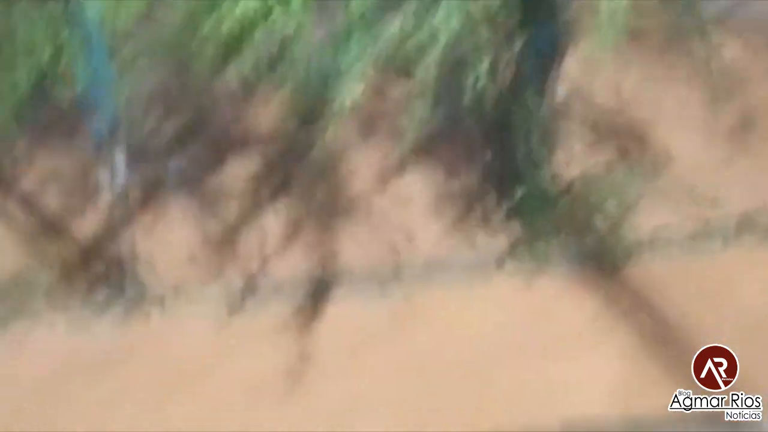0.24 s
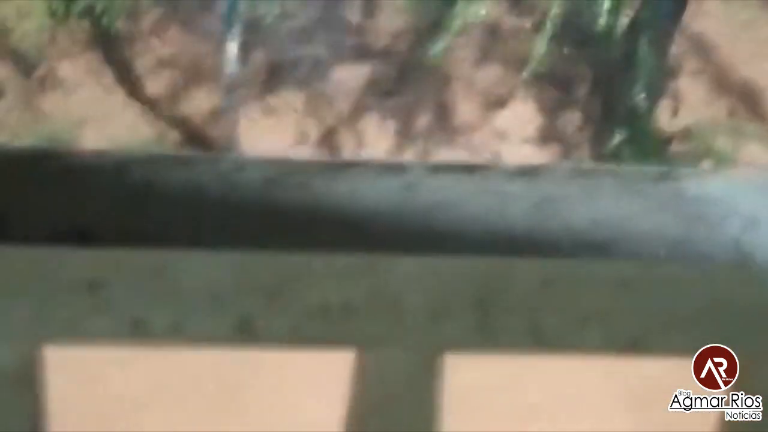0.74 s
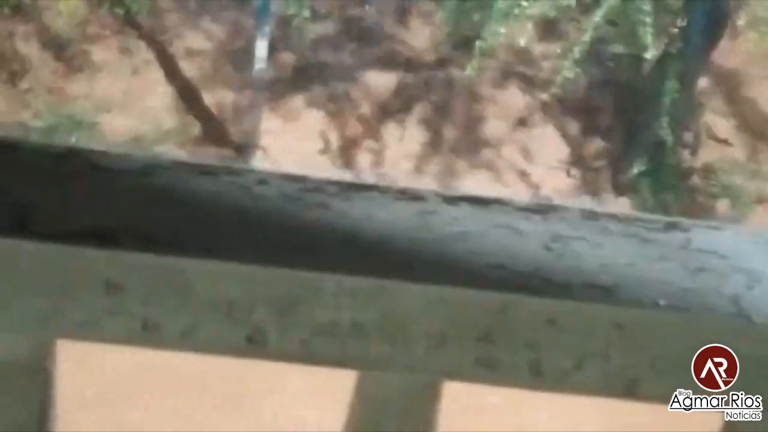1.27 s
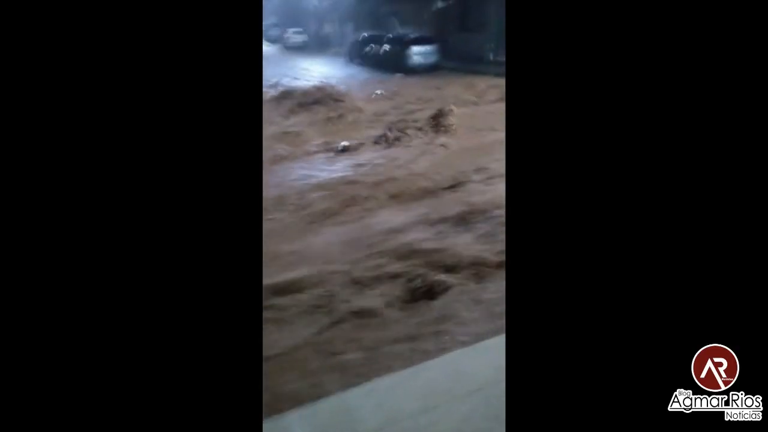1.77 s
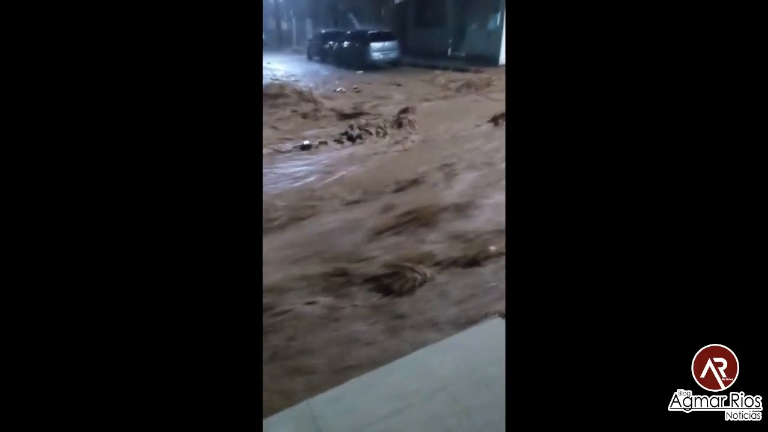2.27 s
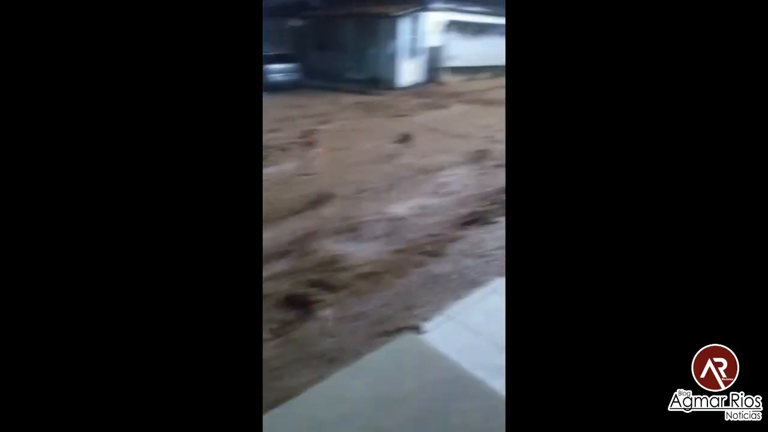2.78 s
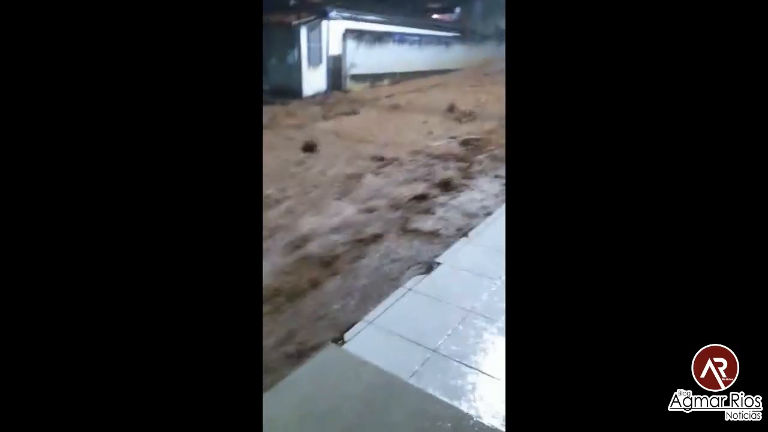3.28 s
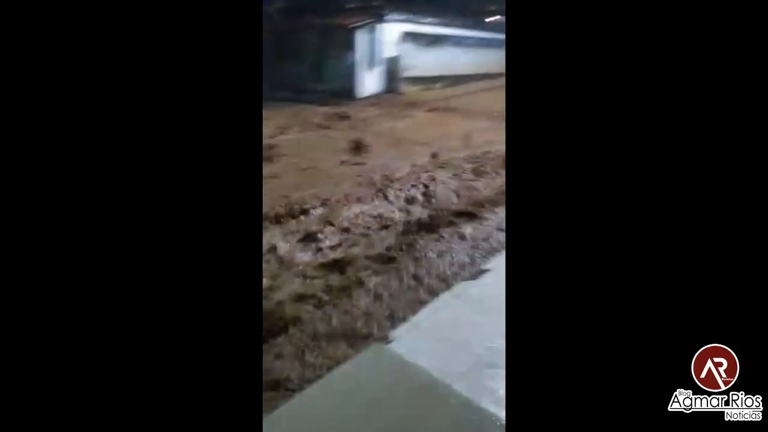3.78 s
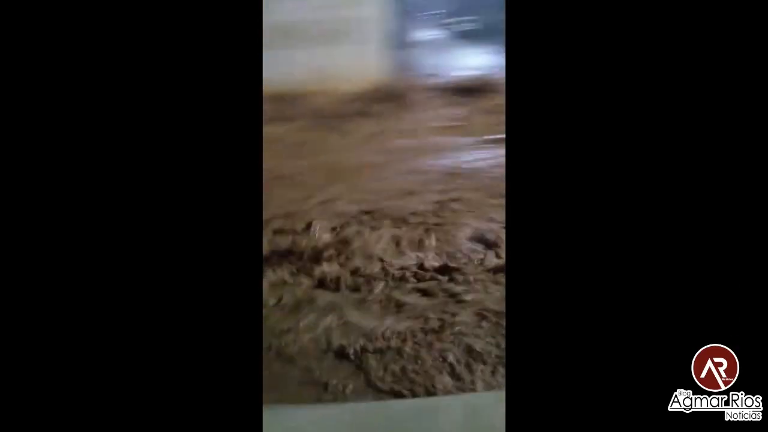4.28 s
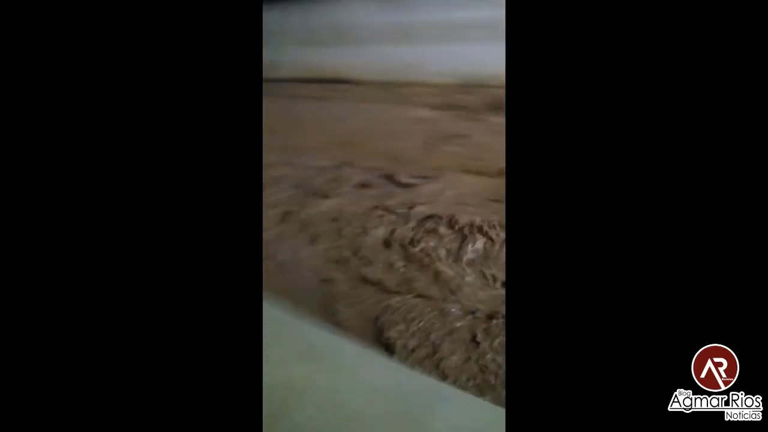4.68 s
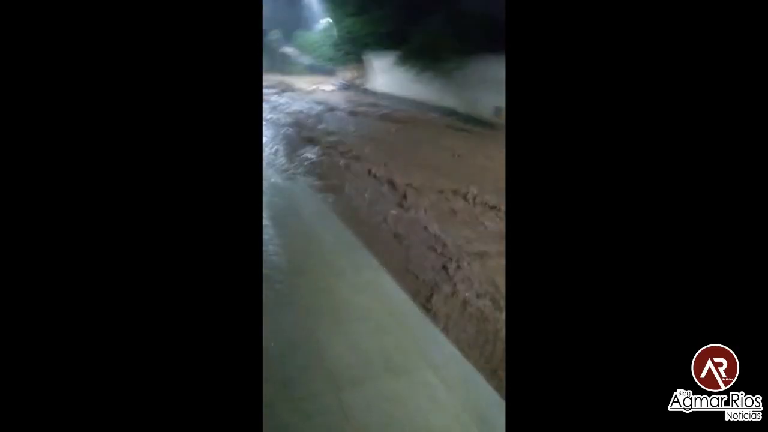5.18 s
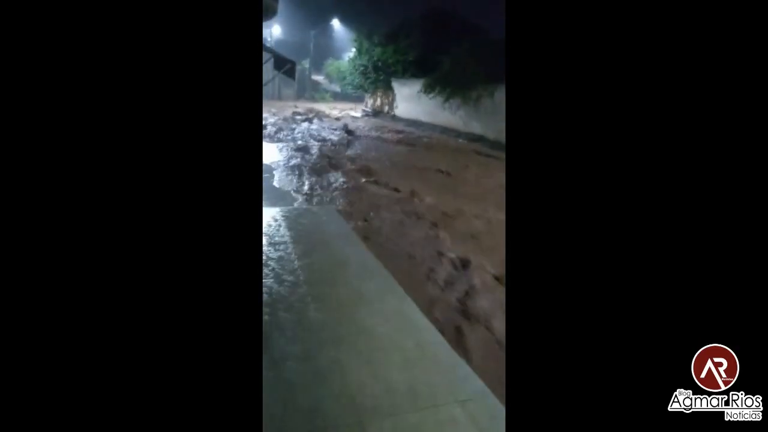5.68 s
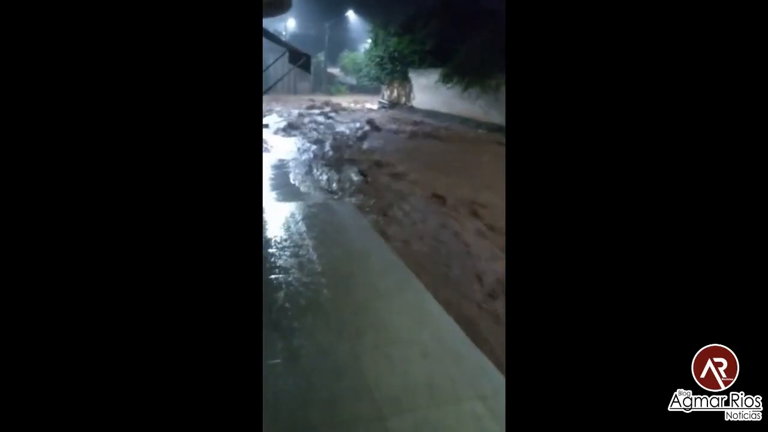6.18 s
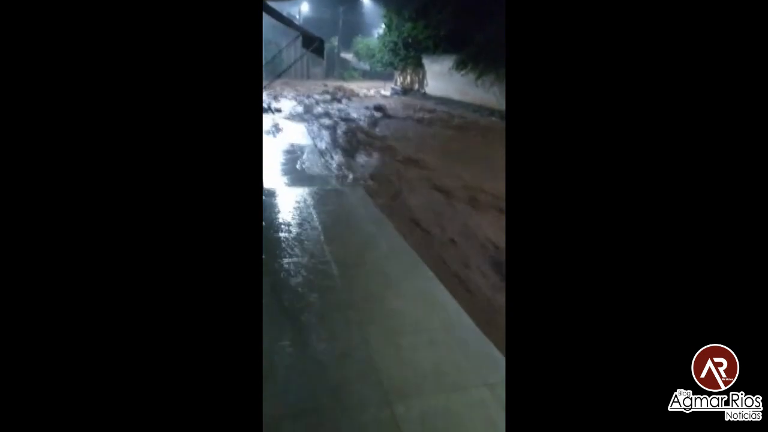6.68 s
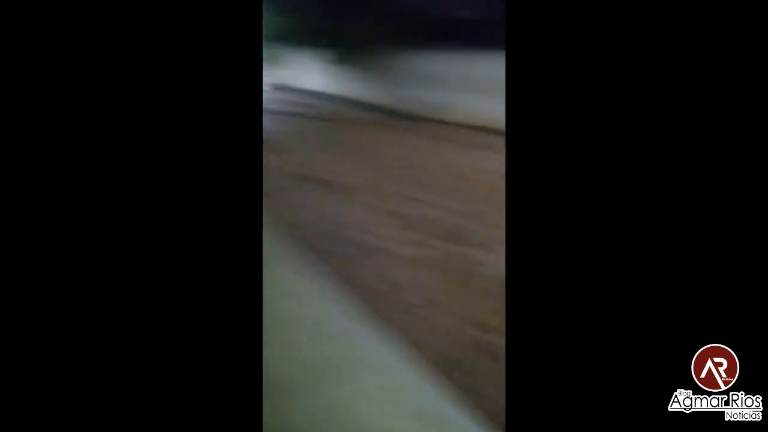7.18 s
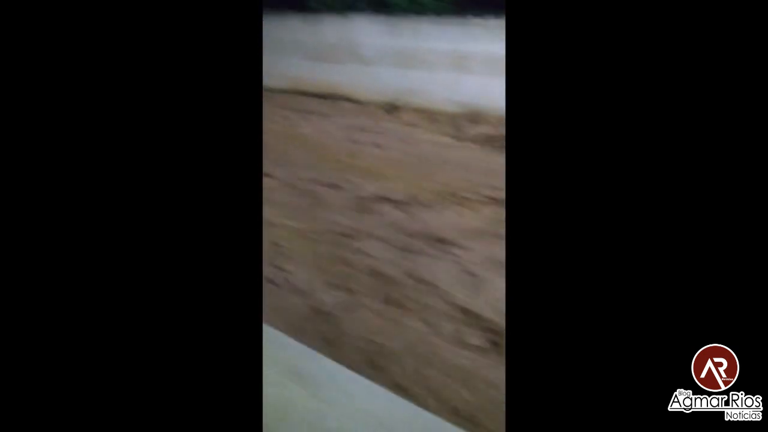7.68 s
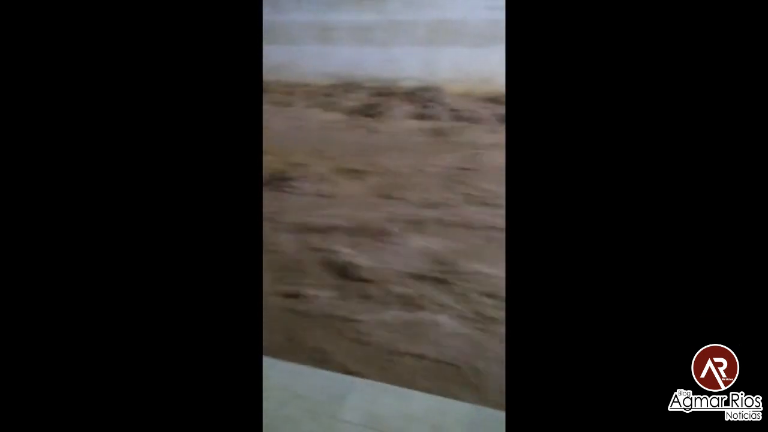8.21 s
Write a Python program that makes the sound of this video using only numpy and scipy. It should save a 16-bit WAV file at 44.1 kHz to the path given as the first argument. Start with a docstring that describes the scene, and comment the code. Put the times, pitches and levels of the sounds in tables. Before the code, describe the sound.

Steady grainy rain and far water wash, abruptly replaced by a close street flood roaring low, with hollow gurgles, slaps and gulps.

```python
"""Flooded street from two places

First a balcony: rain hisses on leaves over far brown water, both as banded noise with burst clicks in it.
After a cut, a phone at the kerb of a street turned torrent: a deep roar of burst air pockets, ringing gurgles,
slaps and gulps, and ticks of bright noise from drops close by.
The phone widens its image by taking from each port a late copy of the other one."""
import sys
import numpy as np
from scipy import signal
from scipy.fft import rfft, irfft, next_fast_len
from scipy.io import wavfile

SR = 44100
rng = np.random.default_rng(int(sys.argv[2]) if len(sys.argv) > 2 else 0)


def wav_record(signal):
    """Record a signal, one row per channel, as 16-bit PCM in the file named by sys.argv[1]."""
    frames = np.transpose(np.atleast_2d(signal))
    bounded = np.clip(frames, -1, 1)
    # unit amplitude maps onto the largest positive 16-bit level
    quanta = np.round(bounded * 32767).astype(np.int16)
    wavfile.write(sys.argv[1], SR, quanta)


N = 372644
SIZE = next_fast_len(N, True)
TIME = np.arange(N) / SR   # seconds
HZ = np.arange(1, SIZE // 2 + 2) * SR / SIZE   # one bin up, so that its logarithm exists
CUT_S = 1.677   # from the balcony to the street


def from_db(db):
    """Decibels to gain."""
    return 10 ** (np.asarray(db) / 20)


def rms_one(x):
    """Scales to rms 1."""
    return x / np.sqrt(np.mean(x ** 2) + 1e-20)


def in_time(rows):
    """Columns of a curve at every sample."""
    s, *columns = np.transpose(rows)
    return [np.interp(TIME, s, c) for c in columns]


def in_pitch(rows):
    """Columns of a spectrum at every frequency bin, straight lines over log frequency."""
    hz, *columns = np.transpose(rows)
    return np.array([np.interp(np.log(HZ), np.log(hz), c) for c in columns])


def bell(hz, centre_hz, octaves):
    """A bump of height 1 around a pitch."""
    return np.exp(-(np.log2(hz / centre_hz) / octaves) ** 2)


def bandpass(x, order, low_hz, high_hz):
    """Keeps what lies between two pitches."""
    return signal.sosfilt(signal.butter(order, [low_hz, high_hz], "band", fs=SR, output="sos"), x)


def drift(rate_hz):
    """Slow chance of spread 1: noise twice through a one-pole low-pass, drawn at every 40th sample."""
    r = np.exp(-2 * np.pi * rate_hz * 40 / SR)
    noise = rng.standard_normal(N // 40 + 2002)
    slow = signal.lfilter([1], [1, -2 * r, r * r], noise)[2000:]   # skips the start-up
    return np.interp(np.arange(N) / 40, np.arange(len(slow)), rms_one(slow))


def ring(clicks, hz, t60):
    """A unit click sets a sine of height 1 ringing, down 60 dB after t60 seconds."""
    r, w = from_db(-60 / (t60 * SR)), 2 * np.pi * hz / SR
    return signal.lfilter([0, np.sin(w)], [1, -2 * r * np.cos(w), r * r], clicks + 1e-18)


def soft(x):
    """Water meets water gently: no click, no push of air."""
    return bandpass(x, 2, 170, 1100)


def bursts(per_s, spread_db, grain_db):
    """Countless far bursts merge into noise; the near ones stand out as clicks of very uneven size."""
    sizes_db = spread_db * np.minimum(rng.exponential(1, (2, N)), 5)
    sizes = from_db(sizes_db) * rng.choice([-1, 1], (2, N))
    near = sizes * (rng.random((2, N)) < per_s / SR)
    return rng.standard_normal((2, N)) + from_db(grain_db) * rms_one(near)


UPPER_ROAR_HZ, UPPER_ROAR_OCTAVES = 754, 0.3
RUMBLE_HZ, RUMBLE_OCTAVES = 90, 0.89


def water(drive, colour, likeness, bass_db, treble_db, treble_hz, surge_db, patchy_db, patchy_hz, octaves,
          flicker, upper_db=0, rumble_db=0):
    """Two-channel rush in third-octave bands: treble surges together, bands near patchy_hz flicker alone; rms 1."""
    alike = np.clip(likeness, -.99, .99)
    mid, side = rfft(drive, SIZE) * np.sqrt([1 + alike, 1 - alike])
    sides = np.array([mid + side, mid - side]) * from_db(in_pitch(colour))
    place = 3 * np.log2(HZ / 30)   # third-octaves above 30 Hz
    surge, out = drift(9.0), 0
    for k in range(29):
        band = np.cos(np.pi / 2 * np.clip(place - k, -1, 1)) ** 2     # neighbours overlap and sum to one
        hz = 30 * 2 ** (k / 3)
        high = 1 / (1 + (treble_hz / hz) ** 2)
        gain_db = (1 - high) * bass_db + high * (treble_db + surge_db * surge)
        gain_db = gain_db + bell(hz, patchy_hz, octaves) * patchy_db * drift(flicker)
        gain_db = gain_db + upper_db * bell(hz, UPPER_ROAR_HZ, UPPER_ROAR_OCTAVES)
        gain_db = gain_db + rumble_db * bell(hz, RUMBLE_HZ, RUMBLE_OCTAVES)
        out = out + from_db(gain_db) * irfft(sides * band, SIZE)[:, :N]
    return rms_one(out)


def gurgle(centre_hz, per_s, cycles, octaves):
    """Large air pockets are trapped at random and ring; most lie near the pitch of the moment; rms 1."""
    sizes_db = 2.6 * np.minimum(rng.exponential(1, N), 3)
    sizes = from_db(sizes_db) * (rng.random(N) < per_s / SR)
    pitches, dealt = np.geomspace(170, 1000, 16), rng.integers(0, 16, N)
    rings = np.zeros(N)
    for k, hz in enumerate(pitches):
        pushes = sizes * bell(hz, centre_hz, octaves) * (dealt == k)
        rings += ring(pushes, hz, cycles / hz)
    return rms_one(soft(rings))


HOLLOW_SWING, HOLLOW_RATE_HZ = 3.5, 9.0   # spread of the emptiness, speed of its drift


def hollowed(pair, mid_hollows, side_hollows):
    """Takes narrow bands out of mid and side: some always empty, others dropping out by chance."""
    out = irfft(np.array([pair[0] + pair[1], pair[0] - pair[1]]) / 2, SIZE)[:, :N]
    for part, hollows in enumerate([mid_hollows, side_hollows]):
        for hz, width_hz, empty in hollows:
            shape = 1 / (1 + (2 * (HZ - hz) / width_hz) ** 12)
            band = irfft(rfft(out[part], SIZE) * shape, SIZE)[:N]
            out[part] -= band * np.clip(empty + HOLLOW_SWING * drift(HOLLOW_RATE_HZ), 0, 1)
    return np.array([out[0] + out[1], out[0] - out[1]])


# narrow bands of the balcony sound drop out briefly by chance, most often around 3340 Hz
DROPOUT_LOW_HZ, DROPOUT_WIDTH_HZ, DROPOUT_CENTRE_HZ = 2810, 200, 3340
DROPOUT_EMPTY, DROPOUT_LOSS_PER_OCTAVE = -0.1, 2.7   # mean emptiness at the centre, and its loss away from it
# more such bands at the top of the balcony sound: pitch_hz, width_hz, mean_emptiness (0-1 once chance is added)
TOP_HOLLOWS = [(12050, 750, 2.6), (11500, 400, -.3), (11000, 350, -1.3), (14750, 600, 1.5)]


def with_dropouts(rush):
    """A row of neighbouring bands, each dropping out on its own; the side has every second one."""
    gaps = []
    for hz in DROPOUT_LOW_HZ + DROPOUT_WIDTH_HZ * np.arange(24):
        away_octaves = abs(np.log2(hz / DROPOUT_CENTRE_HZ))
        gaps.append((hz, DROPOUT_WIDTH_HZ, DROPOUT_EMPTY - DROPOUT_LOSS_PER_OCTAVE * away_octaves))
    return hollowed(rfft(rush, SIZE), gaps + TOP_HOLLOWS, gaps[::2] + TOP_HOLLOWS)


# the balcony, moment by moment: start_s, level_db, rain_brightness_db, low_water_wash_db
BALCONY_LEVEL = [(0.0, -21, -1, -0.4), (0.25, -22.5, 1, -0.6), (0.42, -22, 1, 1), (0.58, -23.5, 4, 1.5),
                 (0.75, -24.5, 4, 0.5), (0.92, -23, 0.5, 0.8), (1.1, -21, -1.5, -2.8),
                 (1.32, -24, 2.5, -0.5), (1.45, -22.5, 2, 0), (1.66, -23, -0.5, 1.3)]
# relative colour at the balcony: pitch_hz, left_db (per Hz), right_db (per Hz)
BALCONY_COLOUR = [(25, -10, -8), (96, -11.5, -12.5), (175, -1, -1), (500, -2, -0.5), (1660, -0.5, -2),
                  (2120, -2, -3), (3260, -12, -10), (7270, -7, -7), (9400, -18.5, 1), (10400, -23, -7),
                  (12300, -36, -29), (12600, -39, -24), (14500, -45, -22), (15000, -48, -42)]
# how alike the two balcony channels are: pitch_hz, likeness (-1 to 1)
BALCONY_LIKENESS = [(60, 0.93), (180, 0.98), (540, 0.45), (1630, -0.042), (4890, 0.19), (14700, 0.048)]
FAR_GURGLE_DB, FAR_GURGLE_HZ = -15, 576   # lumps in the far water below, against the rush
FADE_OUT_S = .008


def balcony():
    """Rain on leaves and far water: noise with clicks in it, alike in the bass and little related above."""
    level_db, rain_db, wash_db = in_time(BALCONY_LEVEL)
    rush = water(bursts(2200, 5.9, grain_db=-13.0), BALCONY_COLOUR, in_pitch(BALCONY_LIKENESS)[0], wash_db, rain_db,
                 treble_hz=4130, surge_db=0.5, patchy_db=2.5, patchy_hz=2500, octaves=2.35, flicker=20.0)
    lumps = gurgle(FAR_GURGLE_HZ, 150, cycles=13, octaves=0.92)
    rush = with_dropouts(rush + from_db(FAR_GURGLE_DB + wash_db) * lumps)
    return from_db(level_db) * rush * np.clip((CUT_S - TIME) / FADE_OUT_S + .5, 0, 1)


ROAR_LATE_DB, ROAR_ARRIVES_S = 7.5, 0.059   # shortfall at the cut, time constant of the catching up


def roar_arrival_db():
    """At the cut the deep roar lags behind the spray, then catches up exponentially."""
    return -ROAR_LATE_DB * np.exp(-np.maximum(TIME - CUT_S, 0) / ROAR_ARRIVES_S)


# relative colour of the street at the two ports: pitch_hz, left_db (per Hz), right_db (per Hz)
STREET_COLOUR = [(28, -44, -41), (66, -17, -19.5), (153.5, 1, -1), (282, 0, -1.5), (516, -7.5, -6.5),
                 (840, -10.5, -12.5), (1790, -20.5, -24.5), (2180, -18, -22), (2500, -18.5, -31),
                 (3300, -25.5, -34), (4240, -26, -24.5), (5670, -20.5, -25), (7670, -20.5, -24),
                 (9960, -27, -30), (14100, -35, -36)]
# upper roar, about 750 Hz: start_s, level_db
UPPER_ROAR = [(1.7, 2.5), (2.2, -1), (2.6, -2), (2.9, .6), (3.15, 0.5), (3.45, -1.3), (3.78, 1.6),
              (4.0, 1.2), (4.4, 2.5), (4.8, 1.1), (5.1, -2), (5.45, -1.6), (5.75, .1), (6.1, -1.5),
              (6.5, -1.5), (6.9, 0), (7.3, -0.3), (7.7, -1.5), (8.1, 0.3), (8.45, 1)]
# deepest rumble, about 90 Hz: start_s, level_db
RUMBLE = [(1.7, 4), (2.0, 4.5), (2.5, 1.5), (3.4, 0.2), (4.6, 1.1), (5.8, -0.5), (6.8, 0), (8.45, 0.5)]


def torrent(roar_db):
    """Roar and spray at the kerb: burst air pockets merged into noise, its low bands rising and sinking."""
    return water(bursts(1500, 3.4, grain_db=-8.0), STREET_COLOUR, in_pitch(PORTS)[0], roar_db, 0,
                 treble_hz=2130, surge_db=0.2, patchy_db=1.03, patchy_hz=6950, octaves=5.7, flicker=13.6,
                 upper_db=in_time(UPPER_ROAR)[0], rumble_db=in_time(RUMBLE)[0])


# churning water at the kerb: start_s, gurgle_db (against the roar), pitch_hz
CHURN = [(1.68, -12, 600), (2.2, -9, 676), (2.6, -10.5, 645), (3.1, -13, 410), (3.4, -14, 500),
         (3.9, -10, 600), (4.3, -23, 400), (4.55, -20, 400), (4.72, -10, 480), (4.9, -10, 340),
         (5.2, -14, 390), (5.65, -5, 340), (5.9, -9.5, 326), (6.3, -8, 344), (6.6, -5.5, 350),
         (7.0, -6, 393), (7.5, -10.5, 387), (8.45, -15, 480)]


def churn(roar_db):
    """Trapped air pockets ring in the torrent, their common pitch wandering."""
    gurgle_db, gurgle_hz = in_time(CHURN)
    return from_db(roar_db + gurgle_db) * gurgle(gurgle_hz, 500, cycles=21.4, octaves=0.44)


# sudden drops of the street level: start_s, depth_db
DIPS = [(1.68, 3.5), (2.91, 2.5), (3.304, 6.5), (3.86, 2.5), (4.255, 4), (5.31, 2.5), (5.69, 1.5),
        (6.115, 2.5)]
DIP_FALL_S, DIP_RECOVERY_S = 0.013, 0.44


def dips():
    """Each dip falls within a blink and fades away exponentially; dB."""
    since = TIME - np.array(DIPS)[:, :1]
    shape = np.clip(since / DIP_FALL_S + .5, 0, 1) * np.exp(-np.maximum(since, 0) / DIP_RECOVERY_S)
    return -np.array(DIPS)[:, 1] @ shape


# the torrent at the kerb, before dips and widening: start_s, level_db
STREET_LEVEL = [(1.68, -17), (2.15, -15.5), (2.55, -18.5), (2.9, -16.5), (3.02, -16.5), (3.1, -15),
                (3.3, -16), (4.25, -15.5), (4.5, -16.5), (4.62, -15), (4.85, -15), (5.05, -16),
                (5.5, -16.5), (5.62, -16), (6.1, -17.5), (6.48, -18.5), (6.62, -15.5), (6.81, -18),
                (7.0, -17), (7.35, -18.5), (7.5, -16.5), (8.45, -17.5)]
# the phone turns; balance before the widening: start_s, left_minus_right_db
PAN = [(1.68, 0.1), (3.2, 0.5), (4.2, 0.4), (5.0, -1.2), (6.2, 0), (7.2, -0.5), (7.7, -1), (8.45, -1)]


def street_level_db():
    """Level of the torrent at the left and right port, dips and turning included."""
    level_db, = in_time(STREET_LEVEL)
    pan_db, = in_time(PAN)
    return level_db + dips() + pan_db / 2 * [[1], [-1]]


# a wave slaps the kerb: start_s, strength_db (before softening), pitch_hz
SLAPS = [(1.831, -2, 261), (1.834, -6.5, 700), (2.418, -5, 476), (2.906, -10, 740), (3.126, -4, 283),
         (3.246, -11, 487), (3.318, -9, 269), (3.649, -4, 340), (4.254, 0.5, 315), (4.308, -3.5, 270),
         (4.73, -18, 380), (4.82, -6, 332), (5.083, -7, 298), (5.186, -6, 480), (5.3, -7, 420),
         (5.66, -4.5, 350), (5.804, -1, 374), (6.541, -3, 342), (6.658, -11, 374), (6.865, -11, 301),
         (7.004, -6.5, 380), (7.319, -2, 360), (7.553, -15, 301), (7.761, -7, 293), (8.26, -3, 293)]


def slaps():
    """A slap traps an air pocket that rings for a few cycles."""
    out = np.zeros(N)
    for s, strength_db, hz in SLAPS:
        push = np.zeros(N)
        push[round(s * SR)] = from_db(strength_db)
        out += ring(push, hz, 7.9 / hz)
    return soft(out) * from_db([[.1], [-1.5]])   # left, right


# big pockets that swell and sing: start_s, length_s, level_db, pitch_hz, rise (end pitch over first pitch)
GULPS = [(2.062, 0.059, -23, 771, 1.03), (2.131, 0.066, -20, 520, 1.3), (4.671, 0.12, -18, 360, 1.13),
         (4.77, .05, -21.5, 739, 1.1), (4.999, 0.19, -15.5, 260, 1.1), (5.36, 0.054, -16.5, 361, 1.18),
         (5.563, .15, -16.5, 317, 1.13), (6.54, 0.067, -18, 347, 1.03), (7.283, 0.092, -16, 320, 1.05)]


def gulps():
    """Each pocket is a soft tone that rises as it nears the surface."""
    out = np.zeros(N)
    for s, length, level_db, hz, rise in GULPS:
        u = np.clip((TIME - s) / length, 0, 1)
        turns = hz * length * (u + (rise - 1) * u * u / 2)
        out += from_db(level_db) * np.sin(np.pi * u) ** 2 * np.sin(2 * np.pi * turns)
    return out * from_db([[.1], [-1.5]])   # left, right


# drops that strike close to the phone: start_s, strength_db, top_hz (upper edge of the tick)
TICKS = [(3.295, -12, 12500), (5.029, -18, 9500), (5.038, -18, 8800), (5.110, -21, 10500),
         (6.104, -9, 12000)]


def ticks():
    """A drop is a millisecond of bright noise."""
    out = np.zeros(N)
    fade = np.exp(-np.arange(300) / SR / .0007)
    for (s, strength_db, top_hz), noise in zip(TICKS, rng.standard_normal((len(TICKS), 300))):
        at = round(s * SR)
        burst = 3 * noise / np.abs(noise[:30]).max() * fade
        out[at:at + 300] += from_db(strength_db) * bandpass(burst, 3, 6200, top_hz)
    return out * from_db([[.1], [-6]])   # left, right


# two ports of the phone: pitch_hz, likeness (-1 to 1), right_lag (radians), late_copy_share (taken away, 0-1)
PORTS = [(40, 0.82, 0.43, 0.56), (204, 1, 0.18, 0.81), (350, 0.75, 0.055, 0.46), (730, 0.48, 0.49, 0.6),
         (1050, 0.14, 0.2, 0.79), (2300, 0.49, .05, 0.86), (2800, 0.042, .05, 1), (3440, 0.022, .05, 0.81),
         (4450, 0.28, .05, 0.71), (6030, 0.036, 0.059, 0.58), (6840, 0.054, .05, 0.23),
         (7800, 0.05, .05, 0.5), (9100, 0.085, .05, 0.22), (10200, 0.07, .05, 0.2),
         (13000, 0.077, .05, 0.34)]
LATE_COPY_S = 0.0004472


def widened(pair):
    """Each port loses a late copy of the other: notches appear at even steps in mid and side."""
    _, lag, share = in_pitch(PORTS)
    left, right = rfft(pair, SIZE)
    right = right * np.exp(-1j * lag)
    late = np.clip(share, 0, 1) * np.exp(-2j * np.pi * HZ * LATE_COPY_S)
    return [left - late * right, right - late * left]


# narrow bands missing from mid and side: some always empty, others dropping out by chance:
# pitch_hz, width_hz, mean_emptiness (held to 0-1 once chance is added)
MID_HOLLOWS = [(2268, 250, 15), (2207, 304, 2.5), (2373, 350, 3), (2067, 180, -2.5), (2560, 146, -2.2),
               (4100, 220, -4), (4700, 180, -4), (4320, 360, 0.9), (4450, 250, 2.3), (4530, 220, 0),
               (6430, 240, -1.5), (6730, 200, -1), (11100, 400, -4), (13350, 500, 1)]
SIDE_HOLLOWS = [(1140, 130, 4), (3420, 350, 6), (5520, 200, -1.5), (10100, 400, -1.3)]
FADE_IN_S, STREET_TOP_HZ = .012, 14300


def street():
    """The torrent and its near splashes at the two ports, widened, less some narrow bands and the top."""
    roar_db = roar_arrival_db()
    rush = (torrent(roar_db) + churn(roar_db)) * from_db(street_level_db())
    rush = rush * np.clip((TIME - CUT_S) / FADE_IN_S + .5, 0, 1)
    wide = widened(rush + slaps() + gulps() + ticks())
    wide = hollowed(wide, MID_HOLLOWS, SIDE_HOLLOWS)
    return signal.sosfilt(signal.ellip(12, .5, 60, STREET_TOP_HZ, fs=SR, output="sos"), wide)


def scene():
    """One place after the other."""
    return balcony() + street()


def record(dry):
    """The top is cut: 70 dB down from 15350 Hz up."""
    return signal.sosfilt(signal.cheby2(14, 70, 15350, fs=SR, output="sos"), dry)


dry = scene()
out = record(dry)
wav_record(out)
```